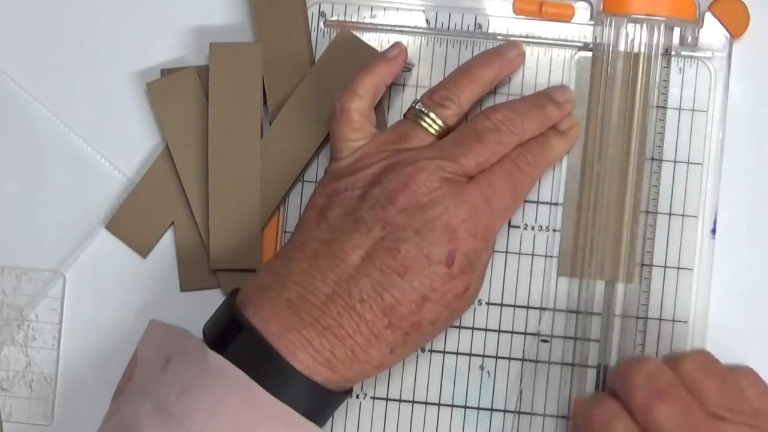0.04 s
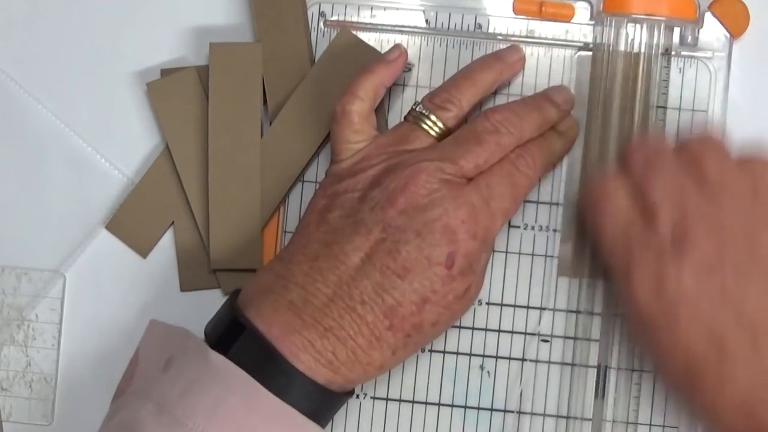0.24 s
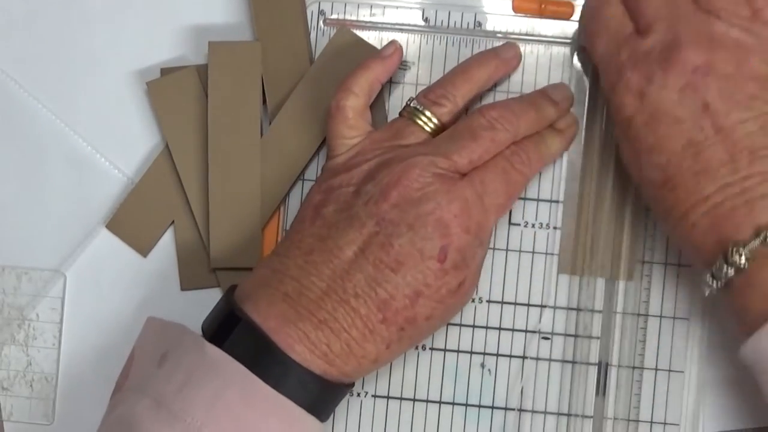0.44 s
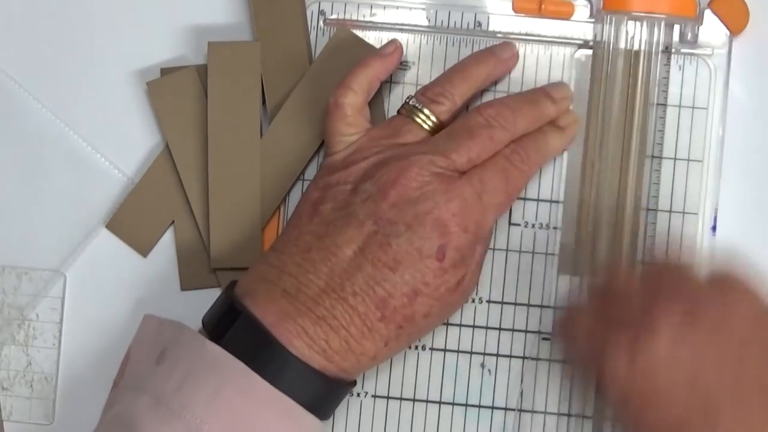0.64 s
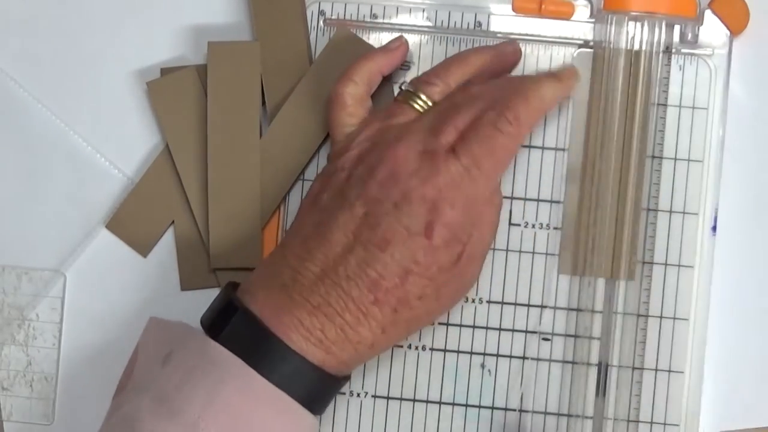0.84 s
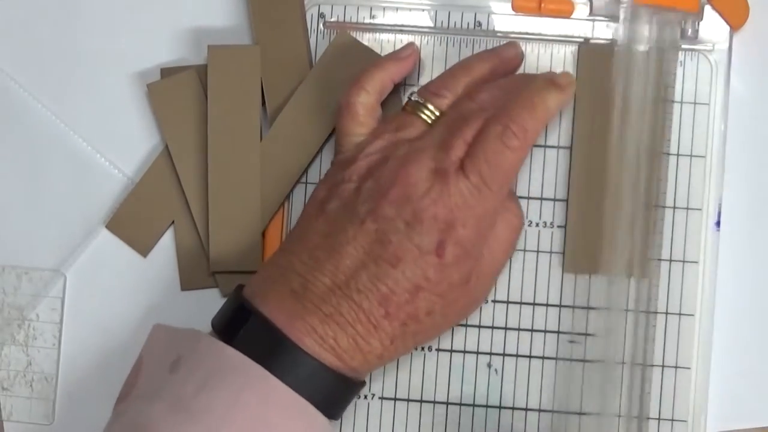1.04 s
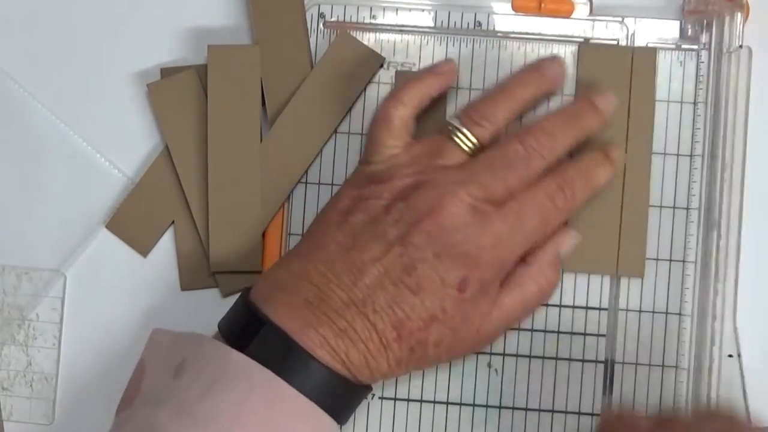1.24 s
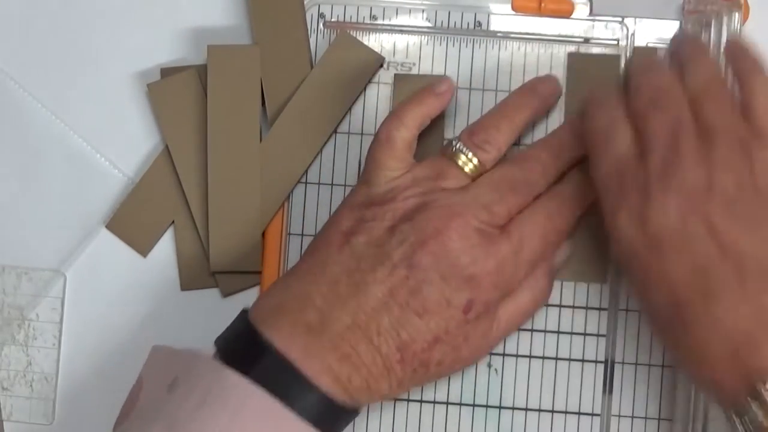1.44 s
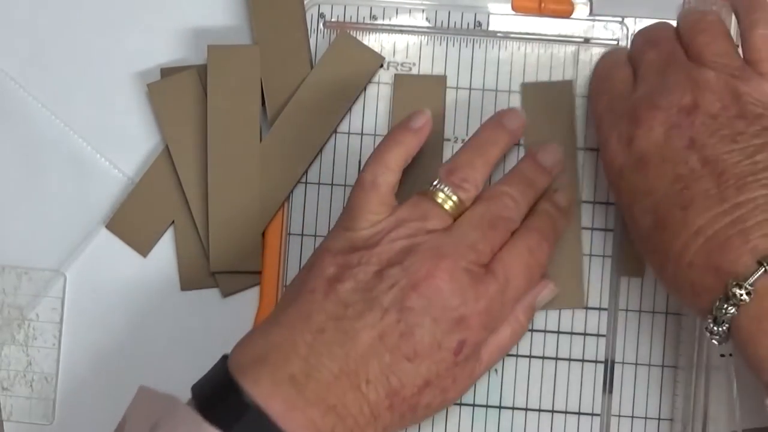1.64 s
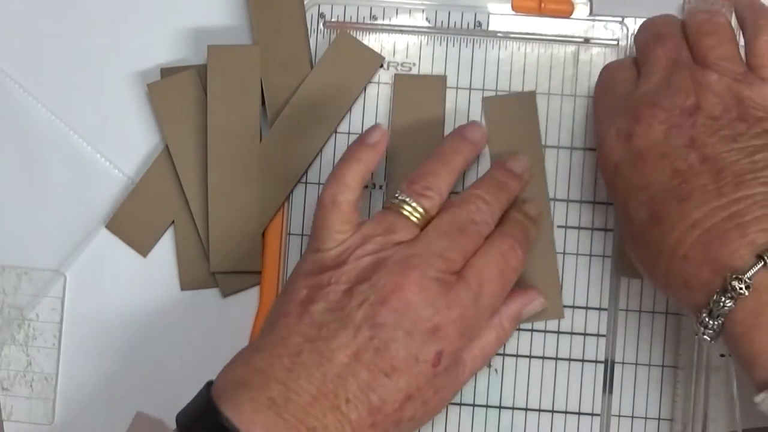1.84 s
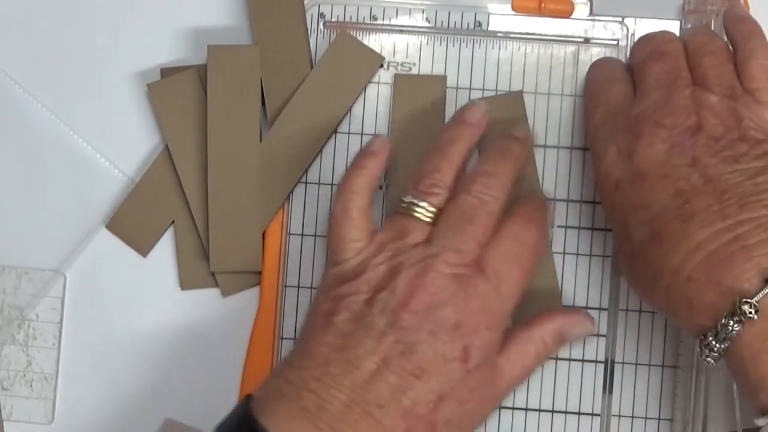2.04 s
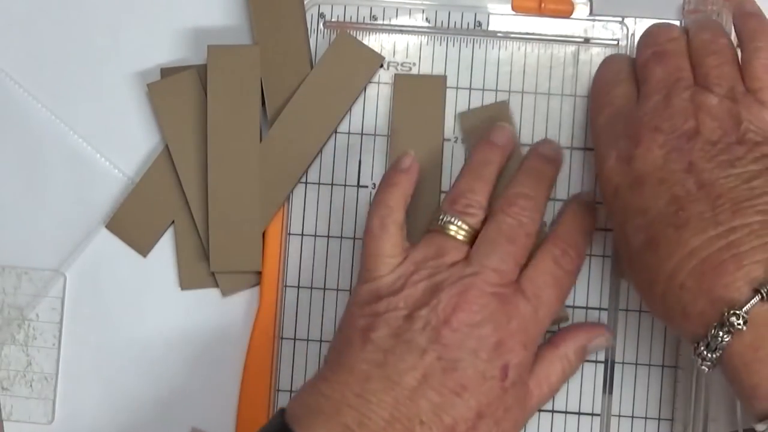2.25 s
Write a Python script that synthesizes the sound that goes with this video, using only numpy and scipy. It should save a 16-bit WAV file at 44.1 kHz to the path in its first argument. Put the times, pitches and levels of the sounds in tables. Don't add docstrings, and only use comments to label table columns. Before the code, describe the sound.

A sliding card cutter rasps twice with hard clicks, followed by clacks and faint shuffling of strips

```python
import sys
import numpy as np
from scipy import signal
from scipy.fft import rfft, irfft, next_fast_len
from scipy.io import wavfile
from scipy.ndimage import uniform_filter1d, map_coordinates

SR = 44100
rng = np.random.default_rng(int(sys.argv[2]) if len(sys.argv) > 2 else 0)


def waveform_to_disk(signal):
    frames = np.transpose(np.atleast_2d(signal))
    scaled = np.clip(frames, -1, 1) * 32767
    samples = np.round(scaled).astype(np.int16)
    wavfile.write(sys.argv[1], SR, samples)


def gain_from_db(level_db):
    decades = np.asarray(level_db, float) / 20
    return 10 ** decades


N = 101429


def unit(x):
    return x / np.sqrt(np.mean(x ** 2) + 1e-20)


def along(points, hz):
    f, v = np.transpose(points)
    return np.interp(np.log(hz + 1), np.log(f + 1), v)


def curves(rows):
    s, *columns = np.transpose(rows)
    return [np.interp(np.arange(N) / SR, s, c, -120, -120) for c in columns]


def wobble(rate):
    return map_coordinates(rng.standard_normal(N // 50), [np.arange(N) * rate / SR])


def filtered(x, response):
    n = x.shape[-1]
    m = next_fast_len(n + 4096)
    return irfft(rfft(x, m) * response(np.fft.rfftfreq(m, 1 / SR)), m)[..., :n]


def noise(spectrum, count=N):
    return unit(filtered(rng.standard_normal(count), lambda hz: gain_from_db(along(spectrum, hz))))


def add(track, s, piece):
    part = track[max(round(s * SR), 0):][:len(piece)]
    part += piece[:len(part)]


def resonance(f, hz, width):
    return 1j * f * width / (hz * hz - f * f + 1j * f * width)


def ring(modes, t, damping):
    out = np.zeros(len(t))
    for hz, db, t60 in modes:
        level_db = db + rng.normal(0, 3.5)
        decay_db = -60 * t / (min(t60, .12) * damping)
        out += gain_from_db(level_db + decay_db) * np.sin(2 * np.pi * hz * t + rng.uniform(0, 6.26))
    return out


def patchy(x, depth_db):
    z = signal.stft(x, nperseg=256)[2]
    field = uniform_filter1d(rng.standard_normal(z.shape), size=3, axis=0)
    field = uniform_filter1d(field, size=10, axis=1)
    return signal.istft(z * gain_from_db(depth_db * unit(field)), nperseg=256)[1][:N]


def friction(colour, body, level_db, weight_db, lumpy_db):
    grains_per_s, grain_spread_db, grain_db, patchy_db = 3700, 0.5, -7, 3.5
    tears = (rng.random(N) < grains_per_s / SR) * rng.standard_normal(N)
    grains = tears * gain_from_db(grain_spread_db * np.minimum(rng.exponential(size=N), 2))
    rough = rng.standard_normal(N) + gain_from_db(grain_db) * unit(grains)
    top = unit(filtered(patchy(rough, patchy_db), colour))
    scrape = gain_from_db(lumpy_db * wobble(70.24)) * top
    drone = gain_from_db(weight_db + 2.8 * wobble(38.93)) * noise(body)
    return gain_from_db(level_db) * (scrape + drone)


def carriage():
    # (time [s], scrape level [dB], weight on the base [dB])
    strokes = [
        [(.062, -54.5, 0), (.14, -43.5, -26), (.235, -37.5, -11), (.255, -31, -11.5), (.35, -33.5, -14.5),
         (.41, -35, 0.5), (.47, -44, 2.5), (.52, -57, -1)],
        [(.53, -54, -15), (.585, -39, -2), (.65, -31.5, -4.5), (.69, -30, -5), (.74, -35, -24), (.77, -54, -14)],
    ]
    # (frequency [Hz], width [Hz], level [dB])
    rail_modes = [(3640, 160, 5), (4700, 110, 1), (8000, 1040, 3.5), (9640, 170, -15)]
    # (frequency [Hz], density [dB per Hz])
    scrape_colour = [(530, -19.5), (900, -2.5), (2500, -4.5), (3650, -0.5), (5070, -5.5), (9430, -2.5),
                     (15000, -23), (15700, -21), (16000, -60)]
    # (frequency [Hz], density [dB per Hz])
    base_drone = [(29, -44), (50, -18), (220, 5.5), (501, -1), (586, 3.5), (768, -5), (1500, -7),
                  (1950, -5), (3300, -120)]
    rail_db = -17

    def rail(f):
        modes = sum(gain_from_db(db) * resonance(f, hz, width) for hz, width, db in rail_modes)
        return gain_from_db(along(scrape_colour, f)) * (1 + gain_from_db(rail_db) * modes)

    return sum(friction(rail, base_drone, *curves(rows), lumpy_db=1.67) for rows in strokes)


def near(modes, hz):
    fade_db = -3
    return [(f, db + fade_db * abs(np.log2(f / hz)), t60) for f, db, t60 in modes]


def tinted(hz, above_db, below_db, count):
    # (frequency [Hz], density [dB per Hz])
    contact_colour = [(700, -16), (1500, -9), (2800, -4), (4300, -3), (6000, -2.5), (10000, -0.5),
                      (15000, -12), (16700, -48)]

    def slope(f):
        octaves = np.log2((f + 1) / hz)
        return gain_from_db(np.where(octaves > 0, above_db, below_db) * octaves)

    return unit(filtered(noise(contact_colour, count=count), slope))


def snaps():
    # (time [s], peak [dB], brightest frequency [Hz], t60 [s])
    snap_events = [(0.2455, -21.5, 1048, 0.019), (0.4264, -6.5, 6760, 0.015), (0.4307, -10, 3530, 0.024),
                   (0.6696, -14.5, 3660, .02), (0.857, -20.5, 3240, 0.013), (0.866, -28, 7000, .01),
                   (0.872, -23, 4870, 0.03), (0.9323, -13, 9300, 0.017), (.9341, -13, 9320, 0.015),
                   (0.9736, -14.5, 7000, 0.019), (0.9747, -13.5, 9670, 0.008), (0.9885, -22.5, 7000, 0.006),
                   (0.9883, -23, 9500, 0.0099), (1.1113, -24.5, 2270, 0.028), (1.142, -19, 2820, 0.011),
                   (1.2114, -8.5, 7260, 0.029), (1.2147, -17, 9660, 0.0099), (1.2176, -8.5, 9860, 0.017),
                   (1.2243, -11.5, 5060, 0.021), (1.234, -14.5, 7800, 0.026), (1.2426, -20, 3090, 0.033),
                   (1.2514, -18, 2880, 0.0098), (1.253, -19.5, 7400, 0.022), (1.2696, -24, 2040, 0.031),
                   (1.27, -27, 6100, 0.027), (1.2862, -20.5, 2055, 0.032), (1.2995, -31, 5500, 0.0073),
                   (1.321, -30.5, 5960, 0.02), (1.3475, -42, 8000, .008), (1.5116, -12.5, 4500, 0.028),
                   (1.5125, -13, 10000, 0.017), (1.6706, -13, 7370, 0.0093), (1.673, -16.5, 5660, 0.031),
                   (1.7807, -10, 9140, 0.026), (1.7836, -11, 5710, 0.017), (2.0122, -14.5, 7280, 0.024),
                   (2.0134, -24, 3940, 0.041), (2.2578, -30.5, 9500, 0.023), (2.279, -40, 1860, 0.015)]
    # (frequency [Hz], level [dB], t60 [s])
    guide_modes = [(3560, -6, .1), (4010, -1, .05), (4565, -2, .1), (5800, -4, .08), (7400, -10, .07),
                   (9900, -7, .07)]
    guide_db, guide_damping = -23, 0.68
    bright_slopes, dull_slopes, dull_hz = (-6, 4.26), (-11.5, 3.1), 3300
    rise_s, hold_s, ring_q, ring_db = .0004, 0.0014, 24, 7.5
    out, t = np.zeros(N), np.arange(SR // 5) / SR
    for s, db, hz, t60 in snap_events:
        slopes = bright_slopes if hz > dull_hz else dull_slopes
        decay = gain_from_db(-60 * np.maximum(t - hold_s, 0) / t60)
        burst = tinted(hz, *slopes, count=len(t)) * decay * (1 - np.exp(-t / rise_s))
        burst = filtered(burst, lambda f: 1 + gain_from_db(ring_db) * resonance(f, hz, hz / ring_q))
        guide = gain_from_db(guide_db) * ring(near(guide_modes, hz), t, guide_damping)
        add(out, s, gain_from_db(db - 0.5) * (burst / np.abs(burst).max() + guide))
    return out


def knocks():
    # (time [s], peak [dB], pitch [Hz], t60 [s])
    knock_events = [(0, -40.5, 228, 0.16), (.225, -38, 71.5, 0.5), (.246, -31.5, 223.6, 0.34),
                    (0.369, -29, 132, 0.11), (0.421, -31, 59.5, 0.23), (0.428, -30, 112, 0.13),
                    (0.586, -31.5, 173, 0.058), (.66, -28, 454, 0.076), (0.8553, -15, 430, 0.014),
                    (0.857, -30, 810, 0.018), (0.859, -16, 197, 0.036), (0.859, -36, 79, 0.36),
                    (0.865, -36, 1157, 0.086), (.8671, -13, 509, 0.015), (.885, -32, 310, 0.04),
                    (.888, -37, 750, 0.027), (.908, -37, 287, .05), (1.095, -43.5, 838, 0.13),
                    (1.137, -42, 830, 0.1), (1.155, -40, 858, 0.12), (1.234, -40, 830, 0.063),
                    (1.241, -27, 131, 0.17), (1.25, -35.5, 1035, 0.047), (1.272, -32, 820, 0.052),
                    (1.3, -40, 701, 0.11), (1.547, -33.5, 151, 0.14), (1.559, -43, 70, 0.3),
                    (1.602, -32, 132, 0.079), (1.855, -42.5, 603, 0.16), (1.959, -35, 614, 0.11),
                    (2.025, -43, 229, 0.12), (2.277, -43, 570, 0.05), (2.283, -33, 113, 0.046)]
    # (frequency [Hz], level [dB], t60 [s])
    base_modes = [(284, -11, 0.076), (450, 6.5, 0.061), (576, 4, 0.045), (662, -1, 0.086), (787, -18, 0.21),
                  (1157, -14, 0.063), (1370, -5, 0.15)]
    base_db, noise_db = -17.5, -5
    out, t = np.zeros(N), np.arange(SR // 3) / SR
    for s, db, hz, t60 in knock_events:
        rumble = noise([(hz / 4, -20), (hz, 0), (hz * 4, -16), (hz * 16, -60)], count=len(t))
        thud = (np.sin(2 * np.pi * hz * t) + gain_from_db(noise_db) * rumble) * gain_from_db(-60 * t / t60)
        plate = gain_from_db(base_db - 2 * abs(np.log2(500 / hz))) * ring(base_modes, t, 1.0)
        rise = 1 - np.exp(-t * hz * 6)
        add(out, s, gain_from_db(db) * rise * (thud + plate))
    return out


def scuffs():
    # (time of the peak [s], 0.1 at the earliest, peak [dB], brightest frequency [Hz], half length
    # [s])
    scuff_events = [(.011, -48, 8200, 0.028), (0.248, -34, 9000, 0.004), (.355, -32, 8000, 0.06),
                    (0.365, -21.5, 6300, 0.0069), (0.423, -25, 2860, 0.0034), (0.45, -32.5, 4306, 0.019),
                    (0.681, -31, 4200, 0.027), (0.79, -39.5, 4030, 0.0083), (0.846, -38, 4070, 0.0043),
                    (0.875, -31.5, 3907, 0.011), (.945, -41, 10000, 0.0037), (0.97, -34, 8050, 0.0013),
                    (1.101, -32, 10200, 0.0031), (1.102, -34.5, 2610, 0.007), (1.112, -43, 2800, 0.018),
                    (1.15, -40, 2472, 0.0091), (1.178, -44.5, 2900, 0.0067), (1.205, -44.5, 3900, .004),
                    (1.26, -36, 1890, 0.046), (1.9, -58.5, 8000, 0.03), (1.696, -54, 8500, 0.025),
                    (1.807, -43, 4260, 0.014), (1.814, -47, 9800, 0.035), (1.959, -45, 8870, .0075),
                    (1.9675, -37.5, 9530, .0042), (2.037, -51, 8440, .021), (2.103, -52.5, 8620, .023),
                    (2.127, -45.5, 6130, .0052), (2.166, -55, 8460, .0065), (2.282, -48, 3380, 0.0043)]
    slopes, grit_db = (-15, 8.1), 14
    out, t = np.zeros(N), np.arange(SR // 5) / SR
    middle = t.mean()
    for s, db, hz, half in scuff_events:
        grit = gain_from_db(grit_db * uniform_filter1d(rng.standard_normal(len(t)), size=64))
        swell = np.exp(-((t - middle) / half) ** 2)
        add(out, s - middle, gain_from_db(db) * grit * tinted(hz, *slopes, count=len(t)) * swell)
    return out


def tinks():
    # (time [s], peak [dB], second mode [dB], third mode [dB], lowest mode [dB])
    tink_events = [
        (.003, -39, 6.5, -9.5, -26),
        (.782, -22, -8, -22, -35),
        (1.333, -37, 0, -12, -30),
        (1.344, -26.5, -8, -17, -24),
        (1.369, -29.5, -10, -17, -24),
    ]
    mode_hz = (9780, 6190, 14100, 1884)
    mode_t60, rise_s = (0.072, 0.049, 0.1, 0.36), 0.00037
    out, t = np.zeros(N), np.arange(SR // 3) / SR
    for s, db, *others_db in tink_events:
        for hz, level_db, t60 in zip(mode_hz, (0, *others_db), mode_t60):
            beat = 1 + 0.074 * np.sin(2 * np.pi * rng.uniform(23, 48) * t)
            envelope = gain_from_db(db + level_db - 60 * t / t60) * (1 - np.exp(-t / rise_s))
            add(out, s, envelope * beat * np.sin(2 * np.pi * hz * t))
    return out


def shuffle():
    # (time [s], level [dB])
    movement = [(.76, -52), (.9, -51), (1.05, -48.5), (1.19, -51.5), (1.33, -47.5), (1.45, -51), (1.6, -46),
                (1.75, -51.5), (1.92, -59.5), (2.1, -54), (2.14, -95), (2.3, -91)]
    # (frequency [Hz], density [dB per Hz])
    card_colour = [(530, -42), (900, -2.5), (4890, -1.5), (6310, -9), (8450, -2), (15600, -24),
                   (15900, -70)]
    # (frequency [Hz], density [dB per Hz])
    table_drone = [(29, -27), (50, 31.5), (586, 9), (706, 0), (861, 19.5), (1500, -48), (1950, -46),
                   (3300, -120)]
    weight_db = -6
    return friction(lambda f: gain_from_db(along(card_colour, f)), table_drone, *curves(movement), weight_db, lumpy_db=1.8)


def hush(raise_db=0):
    # (frequency [Hz], density [dB per Hz])
    hush_colour = [(15, -24), (25, 1), (568, -7), (1250, -17.5), (2090, -19.5), (2460, -23), (8600, -25),
                   (15600, -38), (15900, -80)]
    return gain_from_db(-49.5 + raise_db) * noise(hush_colour)


def tail(stretch):
    # (frequency [Hz], t60 [s])
    room_decay = [(200, 0.29), (4000, 0.13), (14000, 0.16)]
    hz, t, z = signal.stft(rng.standard_normal((2, SR // 2)), SR, nperseg=128)
    t60 = along(room_decay, hz)[:, None] * stretch
    r = signal.istft(z * gain_from_db(-60 * t / t60), SR, nperseg=128)[1]
    return r / np.linalg.norm(r[0])


def scene():
    # (frequency [Hz], left over right [dB])
    lean = [(400, 0), (5000, 1.5), (14000, .3)]
    # (frequency [Hz], side under mid [dB])
    side_level = [(100, -33), (500, -22), (1500, -16), (7000, -15), (14000, -18)]
    room_db = -12.5
    close = carriage() + snaps() + knocks() + scuffs() + tinks() + shuffle() + hush()
    halves = np.array([[.5], [-.5]])
    direct = filtered(np.array([close, close]), lambda f: gain_from_db(along(lean, f) * halves))
    walls = signal.fftconvolve(np.pad(close, (300, 0)), tail(1)[0])[:N]
    scatter = signal.fftconvolve(close, tail(0.6)[0])[:N]
    side = filtered(scatter + hush(7.0), lambda f: gain_from_db(along(side_level, f)))
    return direct + gain_from_db(room_db) * walls + np.array([side, -side])


def band_limit(x):
    return signal.sosfilt(signal.butter(12, 16820, fs=SR, output="sos"), x)


def record(dry):
    low_cut_hz, top_hz = 51, 16800
    mix = filtered(dry, lambda hz: (hz < top_hz) * hz ** 2 / (hz ** 2 + low_cut_hz ** 2))
    return band_limit(mix)


dry = scene()
out = record(dry)
waveform_to_disk(out)
```